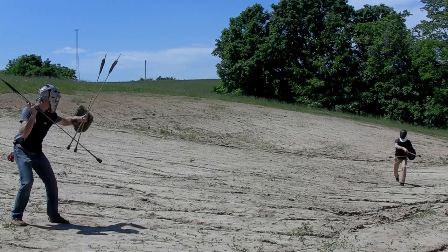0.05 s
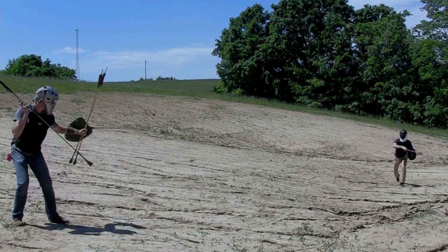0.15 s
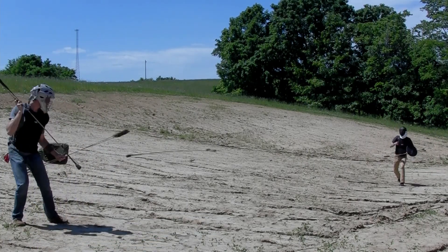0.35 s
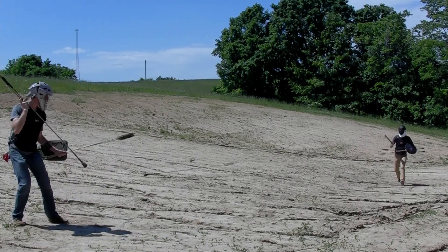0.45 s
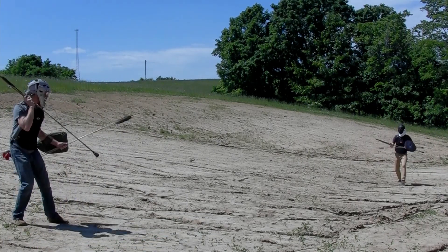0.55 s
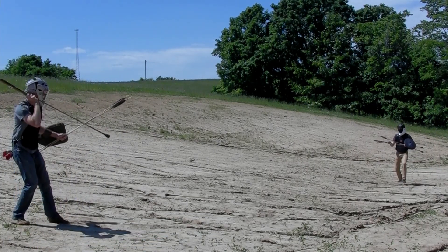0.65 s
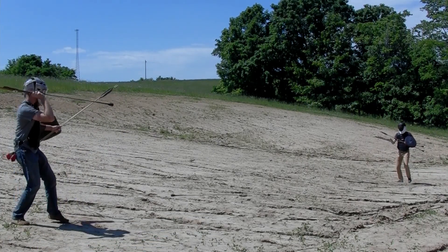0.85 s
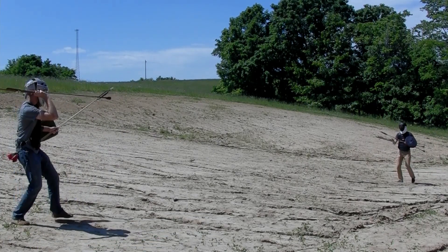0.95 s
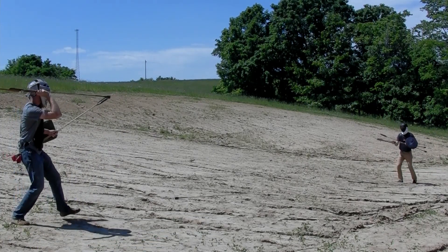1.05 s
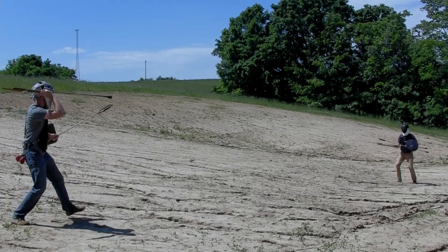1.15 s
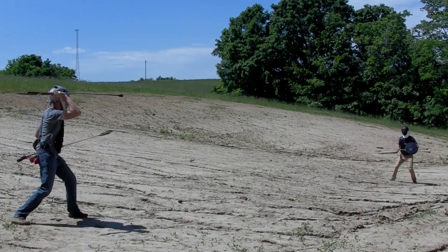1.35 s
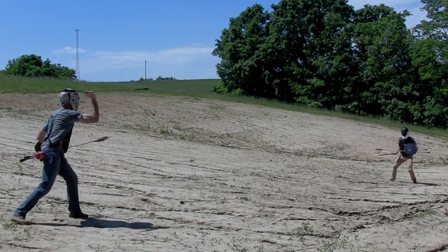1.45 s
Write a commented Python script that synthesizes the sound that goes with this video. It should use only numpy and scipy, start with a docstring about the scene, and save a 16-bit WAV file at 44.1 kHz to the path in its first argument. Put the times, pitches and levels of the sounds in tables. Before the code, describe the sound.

A blunt dart strikes a shield with one sharp knock at about 0.2 seconds, followed by a quick rattle and a faint, short outdoor echo. Clothes swish softly around it. At about 0.7 seconds a quieter footstep thuds and crunches on sand. Spare darts click faintly then, and again near 1.0 and 1.5 seconds. Light wind rumbles on the microphone throughout, over distant leaves and a thin hiss.

```python
"""Dart on a shield

A blunt dart knocks once on a shield in an open sandy field and rattles; the slope scatters a faint tail.
The thrower's clothes swish, a step thuds and crunches on the sand, and spare darts click together.
Wind rumbles lightly on the microphone over distant leaves and a thin hiss."""
import sys
import numpy as np
from scipy import signal
from scipy.fft import rfft, irfft
from scipy.io import wavfile

SR = 44100
rng = np.random.default_rng(int(sys.argv[2]) if len(sys.argv) > 2 else 0)


def transcribe(signal):
    """Save signal, clipped to [-1, 1], as a 16-bit WAV file at the path in sys.argv[1]."""
    frames = np.atleast_2d(signal).T
    limited = np.clip(frames, -1, 1)
    pcm = np.round(limited * 32767).astype(np.int16)
    wavfile.write(sys.argv[1], SR, pcm)


N = 66150
T = np.arange(N) / SR
HZ = np.maximum(np.arange(N // 2 + 1) * SR / N, 1)


def from_db(db):
    """Decibels to gain."""
    return 10 ** (np.asarray(db) / 20)


def at_hz(points, column=1):
    """Table column at every FFT bin, interpolated over log f."""
    table = np.array(points)
    return np.interp(np.log(HZ), np.log(table[:, 0]), table[:, column])


def unit_rms(x):
    """Scale to rms 1."""
    return x / np.sqrt(np.mean(x ** 2) + 1e-20)


def pan(db):
    """Stereo gains for a left-right level difference."""
    return from_db(np.array([[db], [-db]]) / 2)


def drift(rate_hz):
    """Slow random wander, rms 1."""
    pole = np.exp(-2 * np.pi * rate_hz / SR)
    wander = signal.lfilter([1], [1, -2 * pole, pole * pole], rng.standard_normal(2 * N))
    return unit_rms(wander[N:])


def diffuse(spectrum, grain=1):
    """Coloured noise at the two microphone ports, rms 1; grain chops it before colouring."""
    # diffuse field: f/Hz, left-right/dB, coherence, left lead/rad
    ports = [(80, 3, .9, -.2), (330, 2.5, .8, -.3), (650, 3.5, .45, -1.7), (1200, 0, .5, -2.5),
             (2400, -1.2, .45, -3), (4200, -.3, .48, -3.6), (8000, 0, .5, -3.1), (15000, 2.5, .55, -3.1)]
    balance_db, coherence, lead_rad = [at_hz(ports, k) for k in (1, 2, 3)]
    left, independent = rfft(rng.standard_normal((2, N)) * grain)
    right = (coherence * left + np.sqrt(1 - coherence ** 2) * independent) * np.exp(-1j * lead_rad)
    pair = np.array([left * from_db(balance_db / 2), right * from_db(-balance_db / 2)])
    return unit_rms(irfft(pair * from_db(at_hz(spectrum)), N))


def decay(start_s, t60_s):
    """Instant onset, exponential fall."""
    return (T >= start_s) * from_db(-60 * np.clip((T - start_s) / t60_s, 0, 4))


def ring(start_s, hz, t60_s):
    """One struck mode."""
    return np.sin(2 * np.pi * hz * (T - start_s)) * decay(start_s, t60_s)


def swells(rows):
    """Gaussian envelopes of rubbing."""
    return sum(from_db(db) * np.exp(-((T - peak_s) / width_s) ** 2) for peak_s, db, width_s in rows)


def ticks(rows, spectrum):
    """Light contacts, each a short noise burst."""
    return diffuse(spectrum) * sum(from_db(db) * decay(start_s, t60_s) for start_s, db, t60_s in rows)


def wind():
    """Gusts rumble on the microphone ports."""
    # rumble: f/Hz, level/dB
    spectrum = [(15, -38), (35, -11.5), (60, 0.5), (88, 1), (125, -5), (185, -5), (250, -11.5), (350, -23),
                (700, -35), (2000, -55)]
    # gust contour: t/s, level/dB
    gusts = [(0, 3), (.06, -3.5), (.11, 0.5), (.25, -5), (.4, 0.5), (.55, 2), (.76, -4), (.9, 2),
             (1.15, -1.5), (1.23, 0.5), (1.3, -2), (1.38, 2), (1.5, -2.5)]
    level_db = -42 + np.interp(T, *np.transpose(gusts)) + .7 * drift(rate_hz=6)
    return from_db(level_db) * diffuse(spectrum)


def leaves():
    """Distant leaves with a slight flutter."""
    # leaf rustle through the camera's notch filters near 2.85 and 5 kHz: f/Hz, level/dB
    spectrum = [(100, -11.5), (300, -1), (650, -0.5), (1000, -3), (1500, -7.5), (2000, -13), (2550, -18),
                (2850, -38.5), (3300, -18), (4300, -20), (5000, -29.5), (8000, -36)]
    return from_db(-48 + .4 * drift(rate_hz=6)) * diffuse(spectrum)


def hiss():
    """Thin, steady treble noise."""
    # hiss through the camera's notch filters near 2.85 and 5 kHz: f/Hz, level/dB
    spectrum = [(2900, -35), (3400, -24), (4600, -2.5), (5000, -3.5), (5400, 0.5), (8000, -0.5),
                (13000, -1), (15500, 0.5)]
    return from_db(-56.5) * diffuse(spectrum)


def clothes():
    """Fabric swishes as the thrower moves."""
    # movements: t/s, level/dB, half-width/s
    swishes = [(.145, -47.5, 0.061), (.37, -44, 0.068), (.64, -52.5, 0.077), (.73, -51, .025)]
    # fabric rub through the camera's notch filters near 2.85 and 5 kHz: f/Hz, level/dB
    spectrum = [(150, -6), (400, 2), (700, 1.5), (1200, -2), (2100, -4), (2850, -24.5), (3600, -10.5),
                (5000, -35), (10000, -39)]
    return swells(swishes) * diffuse(spectrum)


def knock():
    """The dart rings the shield's damped modes, with a brief crack and a tail off the slope."""
    # shield and dart modes: f/Hz, level/dB, t60/s, left-right/dB
    modes = [(203, -15.5, 0.044, 4), (511, 0.7, 0.019, 2), (658, 4.5, 0.012, 2), (1026, -6, 0.0091, 4),
             (1370, -3.5, 0.0083, 1), (1572, -9.5, 0.014, -4.5), (1767, -12.5, 0.018, -6.5),
             (1850, -29, .014, -11), (2320, -19.5, 0.019, -1.5)]
    # first swing of each mode: sign
    signs = [1, 1, -1, -1, 1, -1, -1, -1, 1]
    # impact crack: f/Hz, level/dB
    crack_spectrum = [(2000, -4), (2900, -6), (3400, -5), (3900, 0), (5500, -2), (7000, -9), (10000, -11),
                      (12500, -7), (16000, -11)]
    # scatter off the slope: f/Hz, level/dB
    tail_spectrum = [(100, -18), (220, -9), (380, -7), (500, 1), (700, -1), (900, -6), (1300, -8),
                     (2100, -13), (2700, -28), (4000, -31), (6000, -44), (9000, -52)]
    strike_s, right_lag_s, body_db = .2076, .0001, -1
    arrivals_s = np.array([[strike_s], [strike_s + right_lag_s]])
    body = sum(sign * from_db(body_db + db) * pan(side_db) * ring(arrivals_s, hz, t60_s)
               for sign, (hz, db, t60_s, side_db) in zip(signs, modes))
    crack = from_db(-28) * decay(strike_s, t60_s=.016) * diffuse(crack_spectrum)
    tail = from_db(-27.5) * decay(strike_s, t60_s=.3) * diffuse(tail_spectrum)
    return body + crack + tail


def rattle():
    """The dart rattles after the blow."""
    # contacts: t/s, level/dB, t60/s
    contacts = [(.268, -46, .004), (.2799, -26.5, 0.0049), (.286, -39, .008), (.2937, -33.5, 0.012),
                (.2966, -39, .008)]
    # contact noise: f/Hz, level/dB
    spectrum = [(1500, -9), (2900, -7), (3900, 6), (6000, -2), (8600, -14), (9800, -20), (13000, -15),
                (16000, -19)]
    return ticks(contacts, spectrum)


def step():
    """A shoe thuds on packed ground and crunches sand grains."""
    # heel, sole, toe: t/s, level/dB
    footfalls = [(0.6887, -21.5), (.699, -31.5), (.7578, -32.5)]
    # ground modes: f/Hz, level/dB, t60/s
    modes = [(273, 4.5, 0.017), (406, -3, 0.0084), (1270, -16.5, 0.015)]
    # crunches of the step, and a gritty burst with the gear click at 1.053 s: t/s, level/dB, half-width/s
    scuffs = [(.6892, -33, 0.0016), (.7, -43, 0.0034), (.7612, -34.5, 0.0066), (1.053, -42, 0.0031)]
    # sand through the camera's notch filters: f/Hz, level/dB
    spectrum = [(120, 3.5), (280, 2.5), (600, -6), (1200, -3), (2200, -13), (2900, -25), (3800, -16),
                (5000, -25), (7000, -33), (15000, -27)]
    low_cut_hz, grains_per_s = 220, 4100
    thuds = sum(from_db(db + mode_db) * ring(start_s, hz, t60_s)
                for start_s, db in footfalls for hz, mode_db, t60_s in modes)
    thuds = signal.sosfilt(signal.butter(2, low_cut_hz, "high", fs=SR, output="sos"), thuds)
    grains = rng.random(N) < grains_per_s / SR
    return thuds * pan(db=2.5) + swells(scuffs) * diffuse(spectrum, grains)


def spare_darts():
    """Shafts touch: a short burst and a soft-onset ring that varies per touch."""
    # dart and gear contacts: t/s, level/dB, t60/s
    clicks = [(.6885, -43, 0.0086), (0.6984, -39.5, .014), (.7418, -37.5, 0.008), (.752, -46, 0.018),
              (1.0285, -43.5, 0.018), (1.053, -39, 0.029), (1.0653, -44.5, 0.03), (1.3133, -50, .018),
              (1.322, -46.5, .018), (1.4816, -38, .016)]
    # contact noise: f/Hz, level/dB
    spectrum = [(1500, -14), (2800, -17), (3400, -6), (3900, 1), (4300, -3), (5100, -12), (6200, -12),
                (8000, -18), (15000, -21)]
    # shaft modes: f/Hz, level/dB, t60/s
    modes = [(3350, 0, .014), (3650, -2, .014), (4300, -3, .013), (6100, -12, .008)]
    ring_db, spread_db, attack_s, port_spread_s = -2, 1, .0012, .0003
    sound = from_db(-6) * ticks(clicks, spectrum)
    for start_s, db, _ in clicks:
        attack = np.clip((T - start_s) / attack_s, 0, 1)
        for hz, mode_db, t60_s in modes:
            arrivals_s = start_s + port_spread_s * rng.random((2, 1))
            gain = from_db(ring_db + db + mode_db + spread_db * rng.standard_normal())
            sound += gain * attack * ring(arrivals_s, hz, t60_s)
    return sound


def scene():
    """Stereo sum of all sources."""
    return wind() + leaves() + hiss() + clothes() + knock() + rattle() + step() + spare_darts()


def record(dry):
    """Gain control ducks just after the knock; soft clip and low-pass follow."""
    threshold_db, duck_share, cutoff_hz = -14, .3, 15900
    attack_s, delay_s, recovery_db_per_s = .012, .012, 50
    peak_db = 20 * np.log10(np.abs(dry).max(axis=0) + 1e-9)
    over_db = np.maximum(peak_db - threshold_db, 0)
    held_db = np.maximum.accumulate(over_db + recovery_db_per_s * T) - recovery_db_per_s * T
    delayed_db = np.interp(T - delay_s, T, held_db)
    pole = np.exp(-1 / (attack_s * SR))
    smoothed_db = signal.lfilter([1 - pole], [1, -pole], delayed_db)
    ducked = dry * from_db(-duck_share * smoothed_db)
    clipped = ducked / (1 + ducked ** 6) ** (1 / 6)
    return signal.sosfilt(signal.ellip(14, .1, 80, cutoff_hz, fs=SR, output="sos"), clipped)


dry = scene()
out = record(dry)
transcribe(out)
```